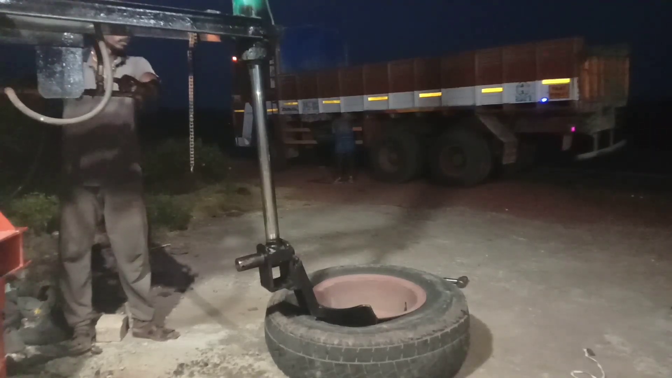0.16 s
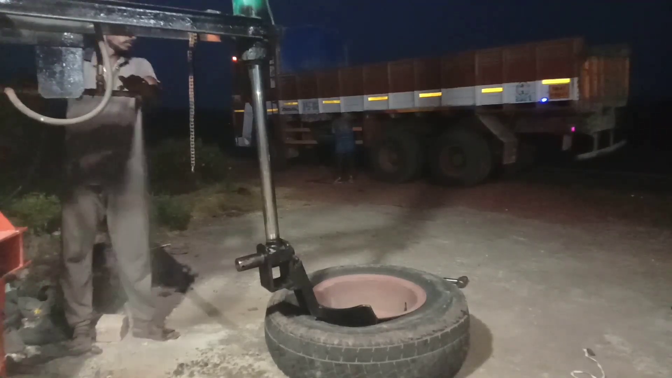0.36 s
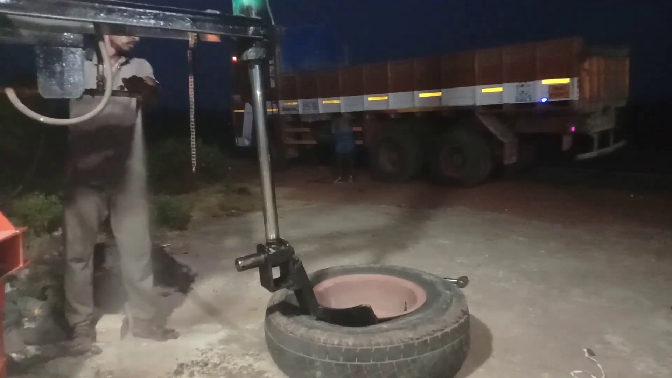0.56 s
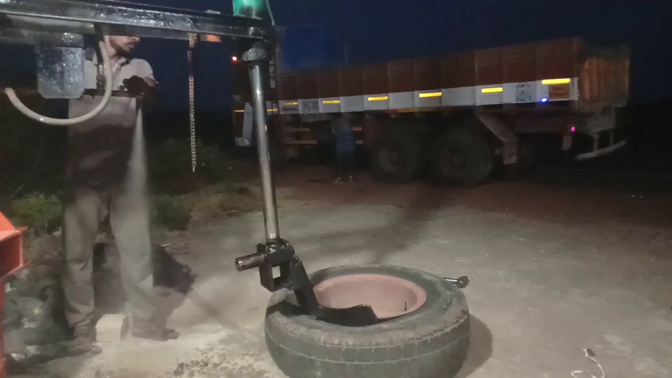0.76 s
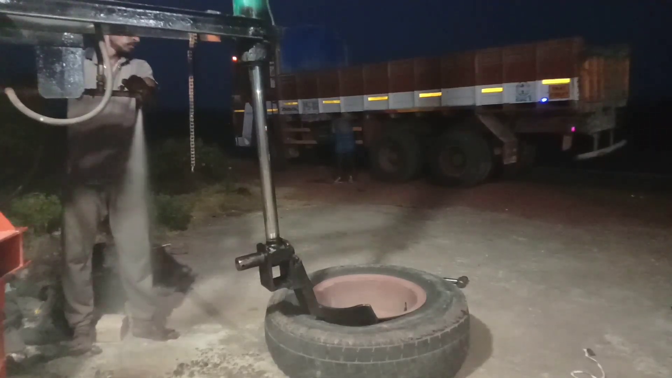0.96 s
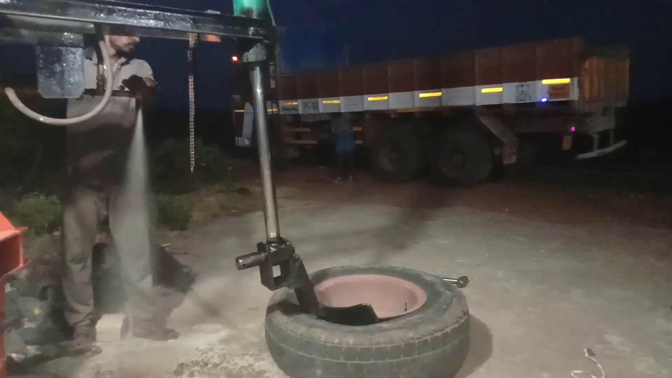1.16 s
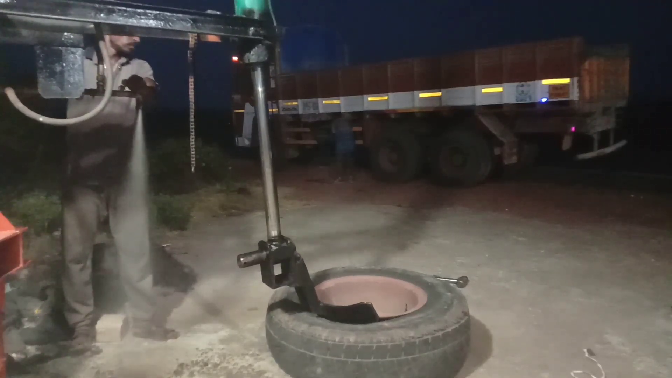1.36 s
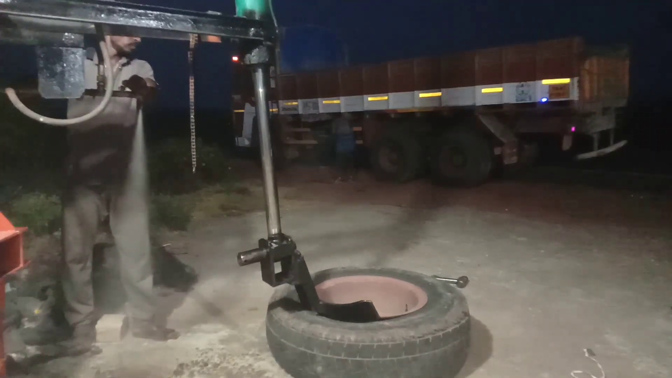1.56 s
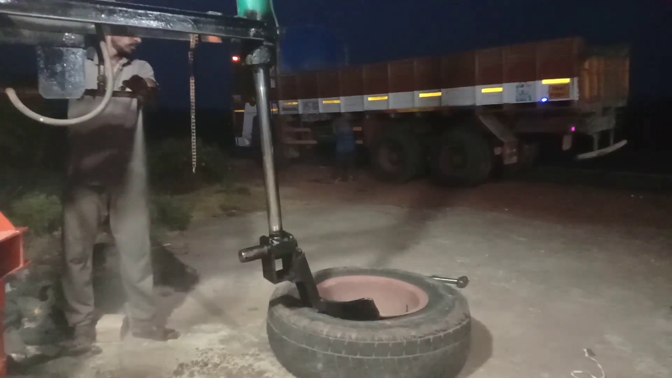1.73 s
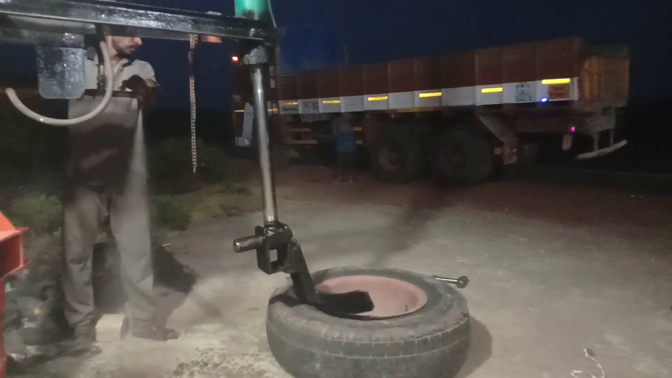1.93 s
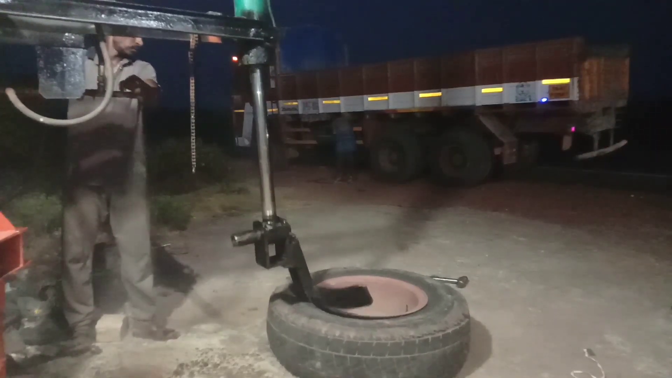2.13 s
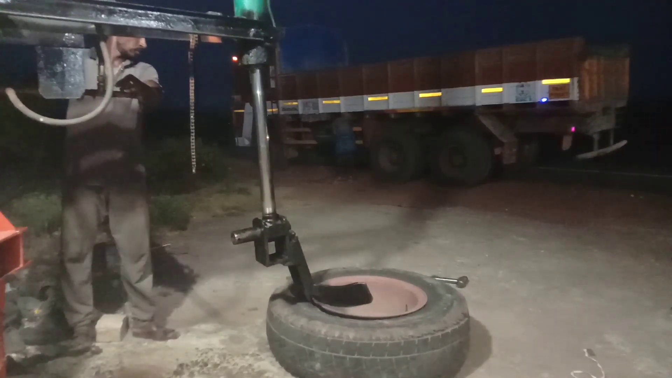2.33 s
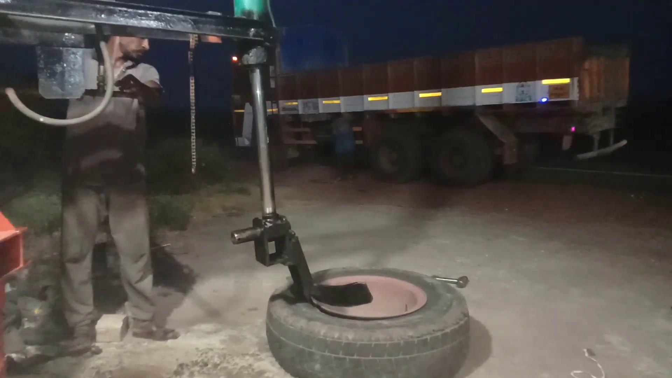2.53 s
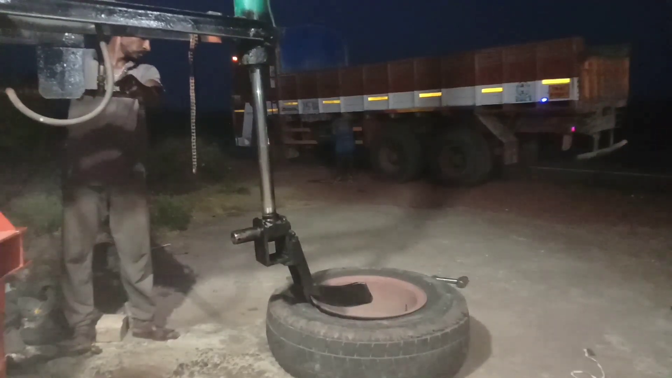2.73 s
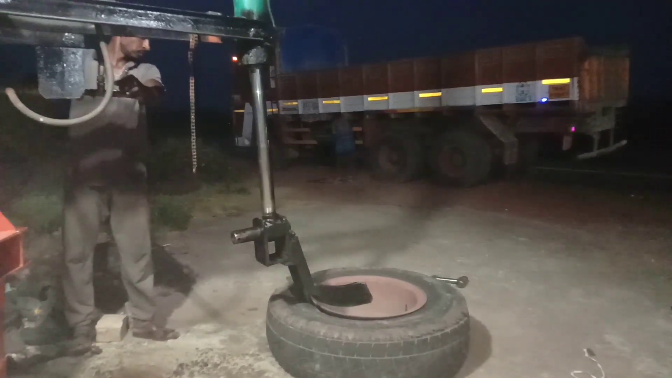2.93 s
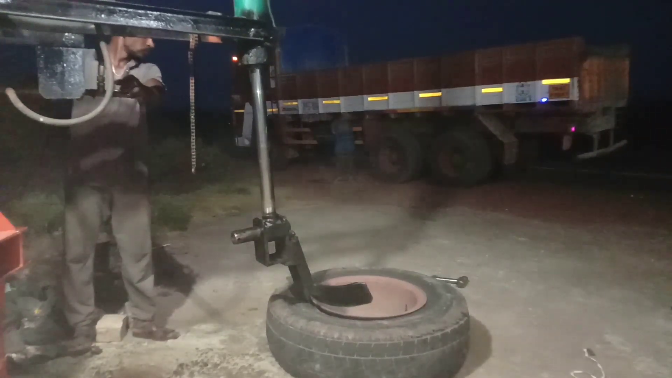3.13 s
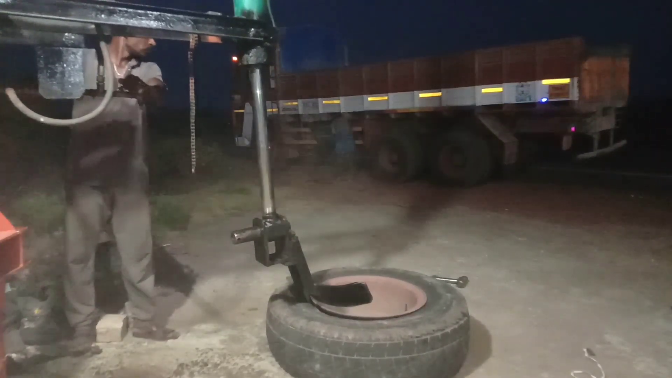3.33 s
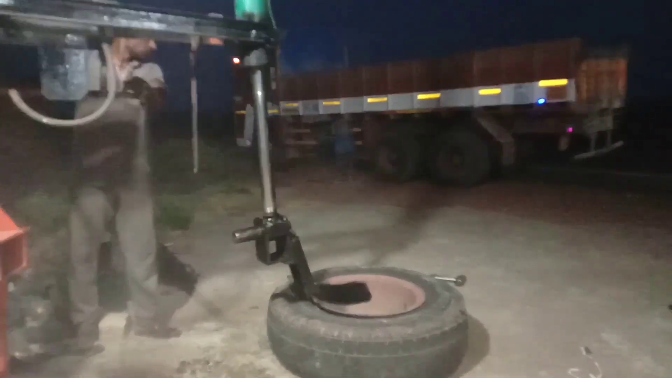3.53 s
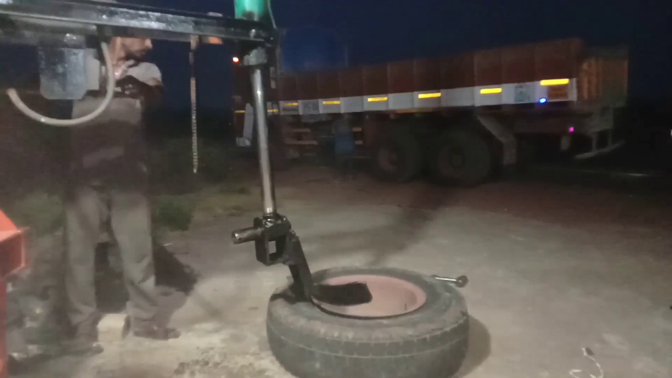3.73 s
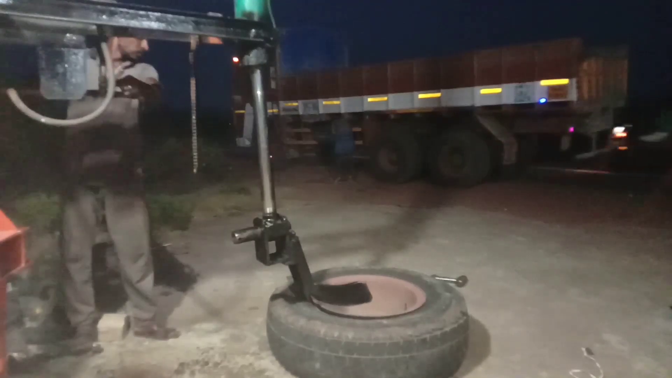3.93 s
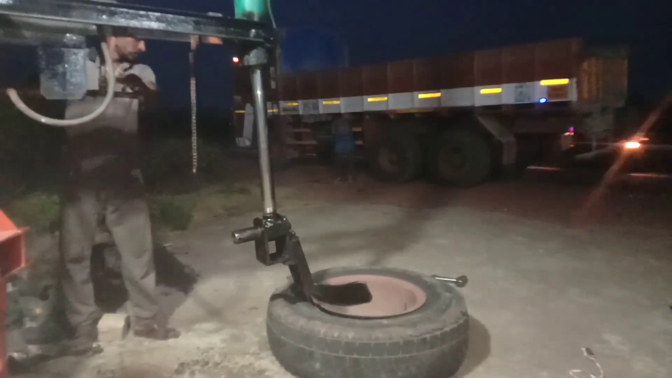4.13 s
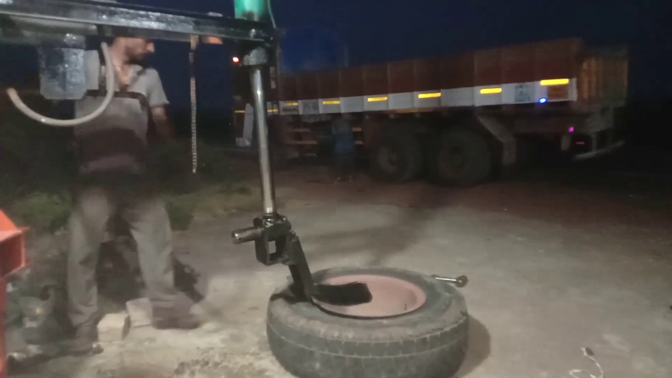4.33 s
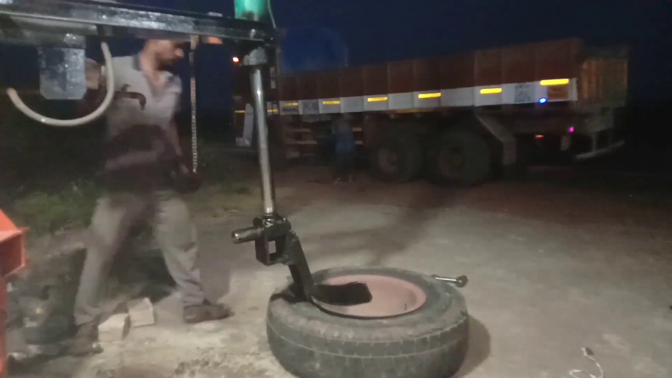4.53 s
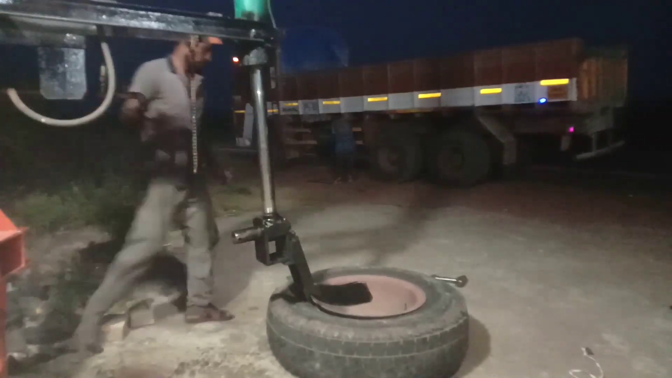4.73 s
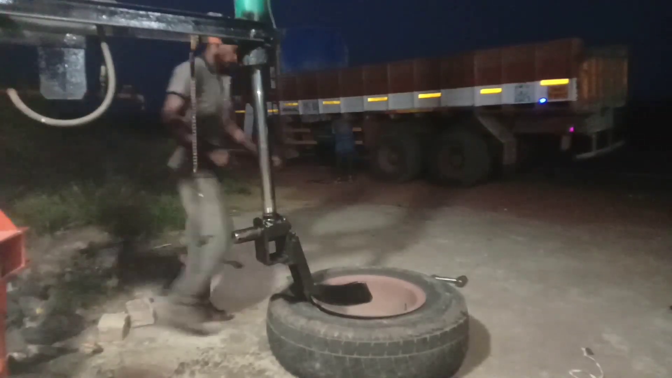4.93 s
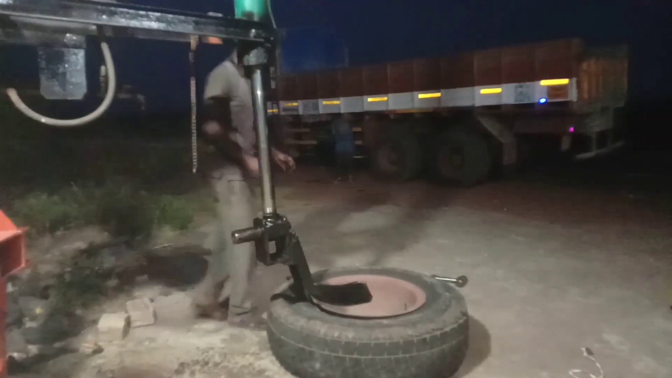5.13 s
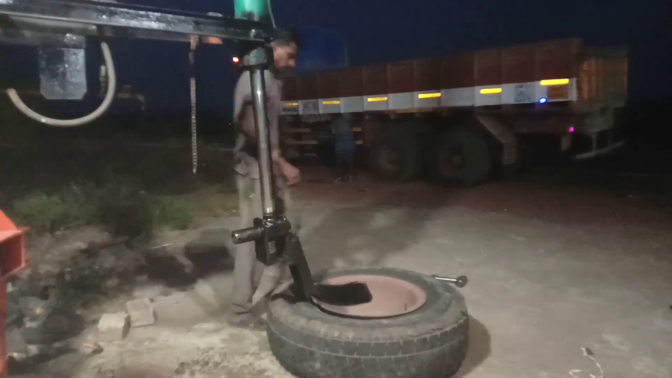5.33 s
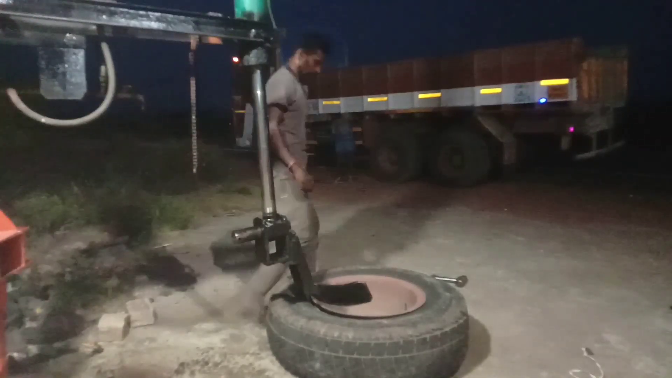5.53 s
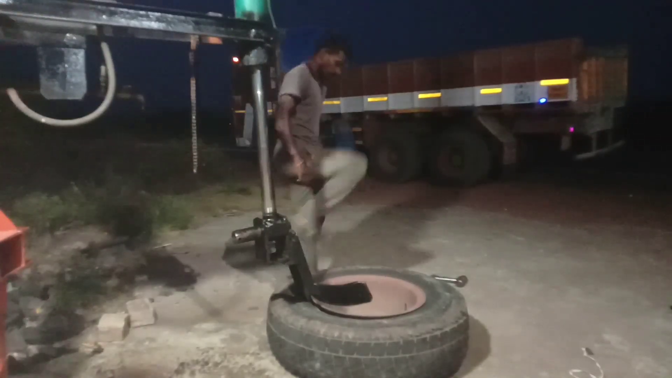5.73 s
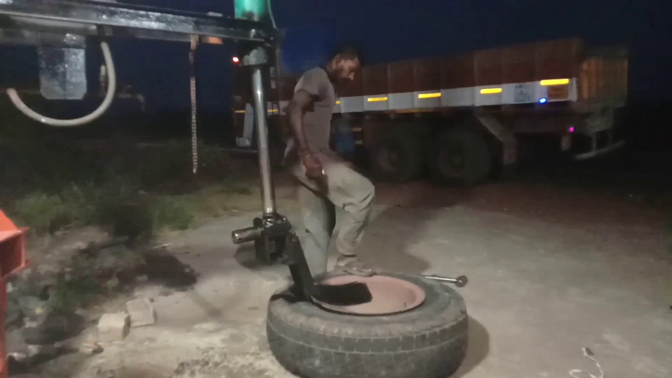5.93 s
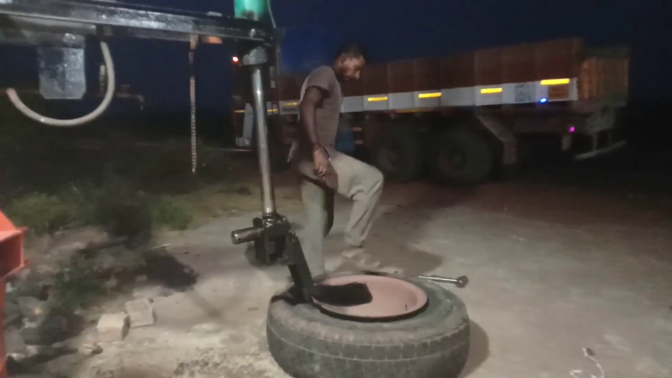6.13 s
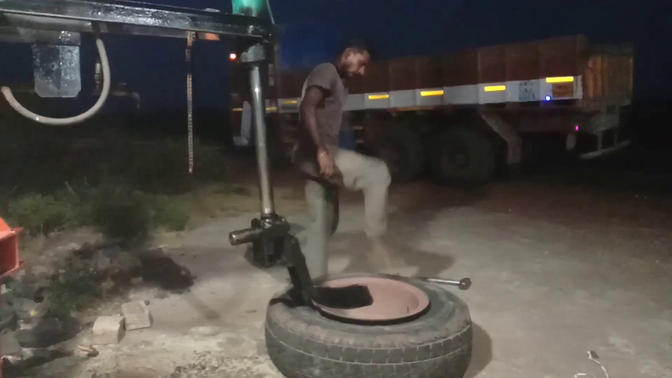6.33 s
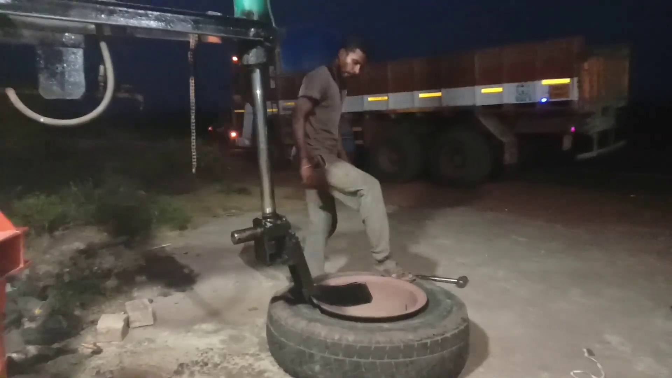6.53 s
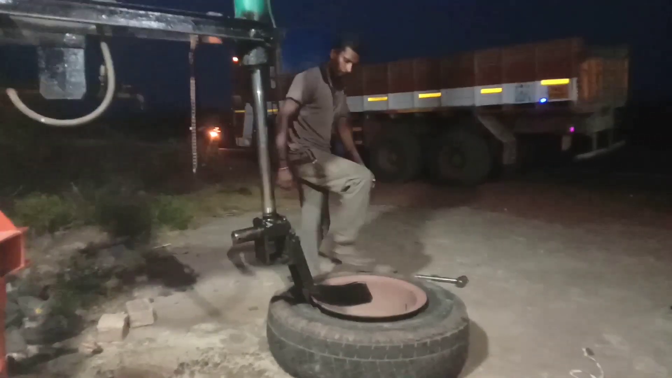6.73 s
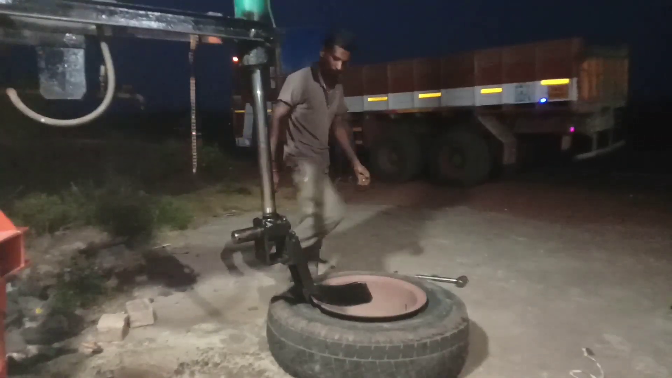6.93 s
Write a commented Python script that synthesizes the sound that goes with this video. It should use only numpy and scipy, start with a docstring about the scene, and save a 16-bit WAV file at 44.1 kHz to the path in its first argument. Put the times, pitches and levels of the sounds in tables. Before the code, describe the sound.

A compressor engine thuds outdoors as a long harsh air blast hisses, then a short one, gritty footsteps, and metallic clanks with heavy tyre thumps.

```python
"""Outdoors at a tyre press, a single-cylinder compressor engine thuds throughout, over noise from a road. While
it ticks over, a man lets air out of a valve in one long blast; turbulent jet noise hisses and roars. Two dull
knocks sound, his shoes crunch on gritty concrete, and a short blast comes as the engine speeds up. He walks on
and treads on a lorry wheel: contact noise cracks, loose steel modes ring and the tyre thumps. The recorder's
gain control turns everything down while the treble is loud, as under the blasts."""
import sys
import numpy as np
from scipy import signal
from scipy.fft import rfft, irfft, next_fast_len
from scipy.io import wavfile
from scipy.ndimage import uniform_filter1d, minimum_filter1d

SR = 44100
rng = np.random.default_rng(int(sys.argv[2]) if len(sys.argv) > 2 else 0)


def persist_wave(psi):
    """Save psi, clipped to +-1, as 16-bit WAV."""
    counts = np.round(np.clip(psi, -1, 1) * 32767).astype(np.int16)
    wavfile.write(sys.argv[1], SR, np.atleast_2d(counts).T)


N = 311782


def undb(db):
    """Amplitude ratio: 20 dB is a factor of ten."""
    return 10 ** (np.asarray(db) / 20)


def unit(x):
    """Normalisation: scale to rms 1."""
    return x / np.sqrt(np.mean(x ** 2))


def track(rows, column=1):
    """Linear interpolation: one column of a curve against time, sample by sample."""
    rows = np.array(rows)
    return np.interp(np.arange(N) / SR, rows[:, 0], rows[:, column])


def band(x, hz, kind, order=2):
    """Butterworth filtering: a maximally flat pass band."""
    return signal.sosfilt(signal.butter(order, hz, kind, fs=SR, output="sos"), x)


def noise(points, peaks=()):
    """Spectral shaping: noise of rms 1 with a (Hz, dB) spectrum and narrow (Hz, width Hz, dB) peaks."""
    size = next_fast_len(N)
    f = np.arange(size // 2 + 1) * SR / size + 1  # the 1 Hz offset avoids log(0)
    hz, db = np.transpose(points)
    shape_db = np.interp(np.log(f), np.log(hz), db)
    for centre, width, peak_db in peaks:
        shape_db = shape_db + peak_db / (1 + ((f - centre) / width) ** 2) ** 2
    spectrum = rfft(rng.standard_normal(size)) * undb(shape_db)
    return unit(irfft(spectrum, size)[:N])


def walk(rate):
    """Slow random modulation: levels held for 1 / rate seconds, smoothed twice, of rms near 1."""
    hold = int(SR / rate)
    levels = np.repeat(rng.standard_normal(N // hold + 1), hold)
    smooth = uniform_filter1d(uniform_filter1d(levels, hold), hold)
    return unit(smooth[:N])


def ring(modes, t):
    """Modal decay: a struck body sounds as a sum of damped sines."""
    out = 0
    for hz, db, t60 in modes:
        out = out + undb(db) * np.sin(2 * np.pi * hz * t) * undb(-60 * t / t60)
    return out


def add(out, s, x):
    """Superposition: mix x into out from time s."""
    i = int(s * SR)
    out[i:i + len(x)] += x[:N - i]


def yard(x, t60=0.43, wet_db=-15, delay=.02):
    """Diffuse reflection: a thin scattered echo from the press and a parked lorry."""
    t = np.arange(SR // 2) / SR
    scatter = band(rng.standard_normal(len(t)), 4100, "lowpass", order=1)
    echo = scatter * np.exp(-np.log(1000) * t / t60) * (t > delay)
    return x + undb(wet_db) * signal.fftconvolve(x, echo / np.linalg.norm(echo))[:N]


def exhaust(pulses, modes, edges_hz):
    """Pipe resonance: gas pulses excite the modes and are rounded by a band-pass; rms 1."""
    rung = signal.fftconvolve(pulses, ring(modes, np.arange(SR // 2) / SR))[:N]
    return unit(band(rung, edges_hz, "bandpass"))


# Machine resonances met by engine harmonics.
# Each row: harmonic number, resonance in Hz, width in Hz, level in dB at resonance.
HARMONIC_HUM = [(8, 155, 6.7, -33), (14, 280, 6.9, -45), (19, 394, 14, -48.5)]
HUM_BUILD_S = 0.3


def hum(speed, turns):
    """Forced resonance: a harmonic swells as the engine's speed brings it near a resonance."""
    out = np.zeros(N)
    for harmonic, hz, width, db in HARMONIC_HUM:
        nearness = 1 / (1 + (2 * (harmonic * speed - hz) / width) ** 4)
        swell = uniform_filter1d(nearness, int(HUM_BUILD_S * SR))
        out += undb(db) * swell * unit(np.sin(2 * np.pi * harmonic * turns))
    return out


# Engine speed. Each row: time in seconds, firings per second.
FIRING_RATE = [(0.0, 13.44), (0.2, 12.84), (2.3, 13.17), (2.7, 13.45), (3.3, 13.0), (3.65, 21.61),
               (4.0, 18.93), (4.65, 19.72), (5.25, 19.04), (5.55, 20.62), (6.0, 20.77), (7.07, 21.72)]
# Exhaust level. Each row: time in seconds, boom level in dB, bark level in dB.
EXHAUST_LEVEL = [(0.2, -41.5, -56), (2.35, -28, -36), (2.85, -32.5, -40.5), (3.25, -30.5, -37),
                 (3.85, -28, -36.5), (4.42, -29.5, -34.5), (4.9, -30, -44.5), (5.35, -32.5, -45),
                 (5.8, -31, -46.5), (6.3, -39, -48.5), (6.75, -36.5, -42)]
# Low and high exhaust resonances at tick-over, then at full speed.
# Each row: frequency in Hz, relative level in dB, t60 in seconds.
IDLE_BOOM_MODES = [(82.5, -9, 0.39), (111, 5, 0.088), (147, 2.5, 0.083)]
IDLE_BARK_MODES = [(215, 5, 0.031), (238, -15.5, 0.078)]
FULL_BOOM_MODES = [(97, 20, 0.23), (118.9, 40.5, 0.11), (148, 0.5, 1)]
FULL_BARK_MODES = [(227, 5.5, 0.018), (284.4, 0.5, 0.045), (370, -42, 0.0075)]
# Spectrum of the casing's clatter. Each row: frequency in Hz, relative level in dB.
CASING_SPECTRUM = [(300, 5), (500, -3.5), (720, 5.5), (930, -1), (1150, -1.5), (1400, -3), (1900, -12),
                   (3500, -64)]
# the clatter's level at a given bark level, and its dB per dB of bark
CLATTER_DB, AT_BARK_DB, CLATTER_SLOPE = -43, -38, 0.64
PUMP_STROKE_DB = -11  # relative to a firing


def engine(puff=0.76, puff_floor=1.0, stroke_phase=.55, lead_s=0.0053):
    """Periodic excitation: firings ring the exhaust and shake the casing; tick-over adds pump strokes."""
    speed = track(FIRING_RATE)
    turns = np.cumsum(speed) / SR + lead_s * speed  # one turn is one firing cycle
    fired = np.diff(np.floor(turns), prepend=0)
    pumped = np.diff(np.floor(turns + 1 - stroke_phase), prepend=0)
    slow = speed < 15
    strokes = undb(PUMP_STROKE_DB) * pumped * undb(2 * walk(25))
    uneven = (fired + strokes) * undb(1.2 * walk(25))
    even = fired * undb(.7 * walk(30))
    idle_boom = exhaust(uneven, IDLE_BOOM_MODES, [60, 260])
    full_boom = exhaust(even, FULL_BOOM_MODES, [74, 260])
    idle_bark = exhaust(uneven, IDLE_BARK_MODES, [150, 480])
    full_bark = exhaust(even, FULL_BARK_MODES, [170, 480])
    boom = np.where(slow, idle_boom, full_boom)
    bark = np.where(slow, idle_bark, full_bark)
    # slight turbulence in the pipe makes every beat a little different
    boom = boom + undb(-12) * noise([(30, -40), (70, -2), (120, 0), (200, -8), (400, -40), (1000, -80)])
    bark = bark + undb(-8) * noise([(100, -30), (200, 0), (380, -2), (600, -18), (2000, -60)])
    # the clatter jumps at each firing and decays over the cycle, above a steady floor
    shaking = puff_floor + np.exp(-(turns % 1) / puff)
    clatter = unit(noise(CASING_SPECTRUM + [(12000, -70)]) * shaking)
    boom_db, bark_db = track(EXHAUST_LEVEL, 1), track(EXHAUST_LEVEL, 2)
    clatter_db = CLATTER_DB + CLATTER_SLOPE * (bark_db - AT_BARK_DB)
    bark = yard(undb(bark_db) * bark, t60=0.22, wet_db=-12.0)
    return undb(boom_db) * boom + bark + undb(clatter_db) * clatter + hum(speed, turns)


# Mean level of the road noise. Each row: time in seconds, level in dB.
ROAD_SWELL = [(0, -47.5), (2.6, -50.5), (2.95, -44), (3.25, -47.5), (4.0, -40.5), (4.95, -54),
              (5.78, -55.5), (6.1, -49), (7.07, -49)]
# Spectrum of the road noise. Each row: frequency in Hz, relative level in dB.
ROAD_SPECTRUM = [(40, 6.5), (150, 17), (450, -23), (900, 9.5), (1250, 6), (2200, 4), (4000, -0.5),
                 (5900, 3.5), (6700, -0.5), (9500, -12), (12000, -25), (14000, -29), (15200, -13)]
# Its narrow ridges and dips. Each row: centre in Hz, width in Hz, change in dB.
ROAD_RIDGES = [(2380, 320, -7), (4860, 350, -2), (6030, 430, 1.5), (6530, 210, -12)]


def road(flicker_db=1.34, wander_db=1.2):
    """Broadband radiation: tyre noise from beyond the yard swells and fades as its bands wander apart."""
    wash = np.zeros(N)
    for edges in ([20, 1800], [1800, 4200], [4200, 18000]):
        part = band(noise(ROAD_SPECTRUM, ROAD_RIDGES), edges, "bandpass", order=3)
        wash += part * undb(wander_db * walk(6))
    return wash * undb(track(ROAD_SWELL) + flicker_db * walk(20))


# Air blasts. Each row: valve opens in seconds, valve shuts in seconds, initial pressure level in dB.
VALVE_BLASTS = [(0.253, 2.122, 3), (3.301, 3.632, -2)]
# Broad spectrum of the jet. Each row: frequency in Hz, relative level in dB.
JET_SPECTRUM = [(30, -29), (60, -11.5), (110, -7.5), (500, -10.5), (1100, -10), (2500, -5), (3500, -6.5),
                (5800, 0.5), (7600, 0.5), (9000, -7.5), (11500, -15.5), (13900, -15), (14700, 0),
                (15600, -12.5)]
# Narrow peaks that colour the jet. Each row: centre in Hz, width in Hz, change in dB.
JET_RIDGES = [(4850, 96, 2.5), (5790, 120, 4.5), (6330, 18, 8.5), (7430, 120, 5)]
# the flow grows as a power of the valve's travel, sags with the pressure and dies once the valve shuts
OPEN_S, OPEN_POWER, SAG_DB_PER_S, SHUT_DB_PER_S = 0.092, 2.4, 1.54, 185
# the hose then bleeds out faintly, from a flow relative to full flow
BLEED_DB, BLEED_DB_PER_S = -51, 25
# the roar against the hiss at full flow, and the power of the flow that it follows
ROAR_DB, ROAR_POWER = -10.5, 1.4


def air(flutter_db=.5, split_hz=3000):
    """Turbulent jet noise: hiss follows the valve's flow, and the low roar a higher power of it."""
    hiss = unit(band(noise(JET_SPECTRUM, JET_RIDGES), split_hz, "highpass", order=3))
    roar = unit(band(noise(JET_SPECTRUM, JET_RIDGES), split_hz, "lowpass", order=3))
    out, t = np.zeros(N), np.arange(N) / SR
    for opens, shuts, db in VALVE_BLASTS:
        since_shut = np.maximum(t - shuts, 0)
        opening = np.clip((t - opens) / OPEN_S, 0, 1) ** OPEN_POWER
        closing = undb(-SHUT_DB_PER_S * since_shut)
        bleed = undb(BLEED_DB - BLEED_DB_PER_S * since_shut)
        flow = opening * (closing + bleed)
        pressure = undb(db - SAG_DB_PER_S * (t - opens))
        out += pressure * (flow * hiss + undb(ROAR_DB) * flow ** ROAR_POWER * roar)
    return out * undb(flutter_db * walk(60))


# Near reflections off the ground and the press. Each row: delay in seconds, level in dB.
NEAR_REFLECTIONS = [(.00496, -17), (.0087, -21), (.0153, -20)]


def reflected(x):
    """Comb filtering: delayed copies interfere with the direct sound and ridge its spectrum."""
    out = x.copy()
    for delay, db in NEAR_REFLECTIONS:
        add(out, delay, undb(db) * x)
    return out


def bump(f, hz, octaves):
    """Contact spectrum: a broad hill around its centre on a logarithmic scale."""
    return (1 + (np.log2((f + 1) / hz) / octaves) ** 2 / 2) ** -2.


def burst(hz, octaves):
    """Contact noise: one second of random excitation under the hill, rms 1."""
    hill = bump(np.arange(SR // 2 + 1), hz, octaves)
    return unit(irfft(rfft(rng.standard_normal(SR)) * hill, SR))


def click(hz, octaves):
    """Impulse response: one second holding a single hard band-passed tick of peak 1."""
    edges = np.minimum([hz / 2 ** octaves, hz * 2 ** octaves], SR / 2 - 1)
    tick = band(signal.unit_impulse(SR), edges, "bandpass", order=3)
    return tick / np.abs(tick).max()


# Steel and tyre blows. Each row: start in seconds, crack level in dB, crack centre in Hz, crack width
# in octaves, crack t60 in seconds, steel ring level in dB, ring centre in Hz, tyre thump level in dB.
WHEEL_BLOWS = [(2.297, -30, 278, 1.96, 0.31, -73, 425, -40),
               (2.488, -27.5, 248, 0.53, 0.063, -70, 425, -46),
               (5.901, -17.5, 1910, 1.07, 0.057, -45, 2400, -18),
               (5.908, -8, 1074, 0.18, 0.027, -51, 2370, -28),
               (5.92, -36.5, 2200, 1.1, 0.61, -56, 1250, -16),
               (5.953, -31.5, 1050, 0.17, 0.21, -31.5, 2120, -23),
               (6.044, -7, 400, 0.64, 0.056, -32.5, 1060, -17),
               (6.087, -23.5, 507, 1.17, 0.21, -55, 864, -15),
               (6.393, -20, 2460, 1.03, 0.053, -40.5, 3580, -20),
               (6.414, -28.5, 1860, 1.25, 0.26, -34.5, 3730, -12),
               (6.494, -33, 355, 0.48, 0.042, -25, 430, -15.5)]
# Modes of the loose steel on the rim, then of the tyre.
# Each row: frequency in Hz, relative level in dB, t60 in seconds.
STEEL_MODES = [(403.5, -1, 0.13), (705, -12, 0.31), (980, 2, 0.13), (1100, 9.5, 0.36), (1240, -18, 0.81),
               (2110, -7, 0.62), (2200, 1, 0.56), (2326, -1, 0.2), (2573, -5.5, 0.93), (3000, -14, .25),
               (3430, -12, 0.18), (3420, 1.5, 0.24), (3820, 2, 0.21), (3770, 4, 0.11), (5900, 3, 0.22)]
TYRE_MODES = [(101, -2, 0.1), (163.5, 2.5, 0.042)]


def clanks(reach_octaves=0.47, click_db=-13, rattle_db=2.5):
    """Modal excitation: each blow cracks, rings the steel modes near one pitch and thumps the tyre."""
    out, ringing, t = np.zeros(N), np.zeros(N), np.arange(SR) / SR
    for s, db, hz, octaves, t60, ring_db, ring_hz, thump_db in WHEEL_BLOWS:
        scrape = burst(hz, octaves) * np.exp(-np.log(1000) * t / t60)
        crack = undb(click_db) * click(hz, octaves) + scrape
        crack = crack * (1 - np.exp(-2 * hz * t))  # a dull contact takes longer to build up
        add(out, s, undb(db) * crack + undb(thump_db) * ring(TYRE_MODES, t))
        steel = np.zeros(SR)
        for mode in STEEL_MODES:
            steel += bump(mode[0], ring_hz, reach_octaves) * ring([mode], t)
        add(ringing, s, undb(ring_db) * steel)
    # the loose steel chatters on the rim while it rings
    return out + ringing * undb(rattle_db * walk(170))


# Small stones snapping underfoot. Each row: start in seconds, peak level in dB, centre in Hz.
STONE_SNAPS = [(2.622, -27, 3500), (3.025, -17.5, 2150), (4.342, -14, 3570), (4.639, -28, 5000),
               (5.057, -32, 2800), (5.38, -22, 3600), (5.4586, -14.5, 3330), (6.823, -18, 4000)]
# Shoes dragging on grit. Each row: time of the swell's peak in seconds, level in dB, centre in Hz,
# exponential rise time in seconds, t60 in seconds.
SHOE_SCUFFS = [(2.79, -37, 1580, 0.0055, 0.29), (4.341, -36, 3360, 0.011, 0.29),
               (4.739, -43, 3300, 0.0097, 0.095), (5.059, -35, 2430, 0.0051, 0.12),
               (5.275, -42, 1340, 0.028, 0.42), (5.382, -43, 3440, 0.0045, 0.23),
               (5.469, -42.5, 2820, 0.02, 0.57), (5.868, -36.5, 2760, 0.016, .07),
               (6.119, -44, 3830, .021, .6), (6.605, -33, 1350, .0022, 0.43),
               (6.658, -42.5, 1150, 0.019, 0.21), (6.697, -43, 3420, 0.071, .22),
               (6.848, -36, 2920, 0.019, 0.23)]
SNAP_OCTAVES, SCUFF_OCTAVES = 0.72, 0.92


def steps(grit_db=3.5):
    """Granular friction: soles drag on grit in swells of uneven crunching, and now and then a stone snaps."""
    out, t = np.zeros(N), np.arange(SR) / SR - .5
    for s, db, hz, rise, t60 in SHOE_SCUFFS:
        swell = np.exp(np.minimum(t / rise, -np.log(1000) * t / t60))
        add(out, s - .5, undb(db) * swell * burst(hz, SCUFF_OCTAVES))
    out = out * undb(grit_db * walk(600))
    for s, db, hz in STONE_SNAPS:
        add(out, s, undb(db) * click(hz, SNAP_OCTAVES))
    return out


def scene():
    """Superposition: all sources reach one microphone, heard alike in both channels."""
    mono = engine() + road() + reflected(air()) + yard(clanks() + steps())
    return np.array([mono, mono])


# target treble level, most it can turn down, averaging time and hold
AIM_DB, RANGE_DB, AVERAGE_S, HOLD_S = -26.5, 20, 0.026, 0.0053


def gain_control(x, sense_hz=3800):
    """Level compression: loud treble turns the whole sound down within a range; gain returns after a hold."""
    average, hold = int(AVERAGE_S * SR), int(HOLD_S * SR)
    power = uniform_filter1d(band(x, sense_hz, "highpass") ** 2, average)
    treble_db = 10 * np.log10(np.abs(power) + 1e-12)
    gain_db = np.clip(AIM_DB - treble_db, -RANGE_DB, 0)
    held_db = minimum_filter1d(gain_db, hold, origin=(hold - 1) // 2)
    return x * undb(uniform_filter1d(held_db, average))


# Resonance and dip of the microphone port. Each row: centre in Hz, width in Hz, change in dB.
PORT_RESONANCES = [(1253, 64, 10), (6550, 52, -26)]
# The microphone's own narrow hiss. Each row: frequency in Hz, relative level in dB.
HISS_SPECTRUM = [(3000, -45), (6500, -33), (7150, 6.5), (7600, 11), (8500, 5.5), (9200, -9), (10000, -17),
                 (11300, -54)]
TOP_HZ = 15600


def record(dry, hiss_db=-46.5):
    """Transducer response: the port colours, hiss is added, gain is ridden, deep bass and top are cut."""
    heard = dry
    for hz, width, db in PORT_RESONANCES:
        b, a = signal.iirpeak(hz, hz / width, fs=SR)
        heard = heard + (undb(db) - 1) * signal.lfilter(b, a, heard)
    hiss = undb(hiss_db) * noise(HISS_SPECTRUM + [(15000, -56)])
    heard = gain_control(heard + hiss)
    heard = band(heard, 57, "highpass", order=3)
    return signal.sosfilt(signal.ellip(12, .2, 80, TOP_HZ, fs=SR, output="sos"), heard)


dry = scene()
out = record(dry)
persist_wave(out)
```